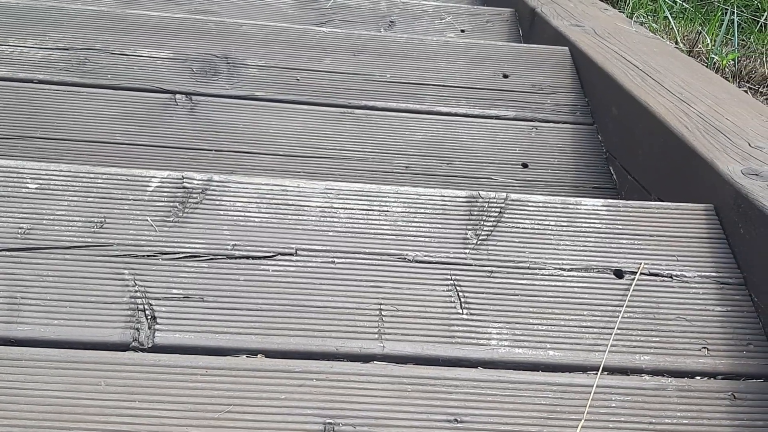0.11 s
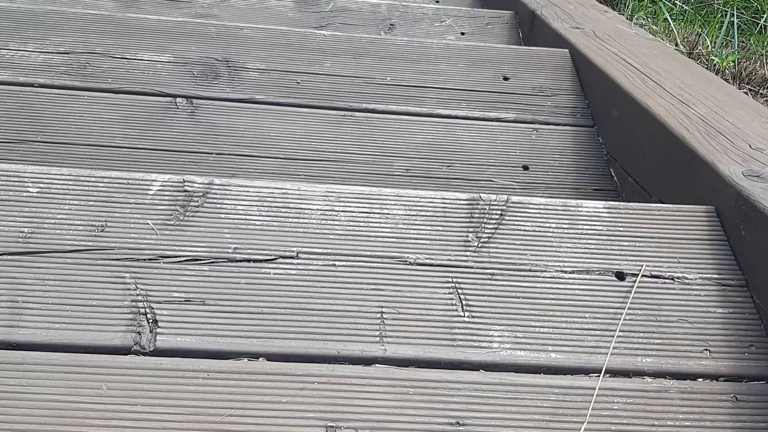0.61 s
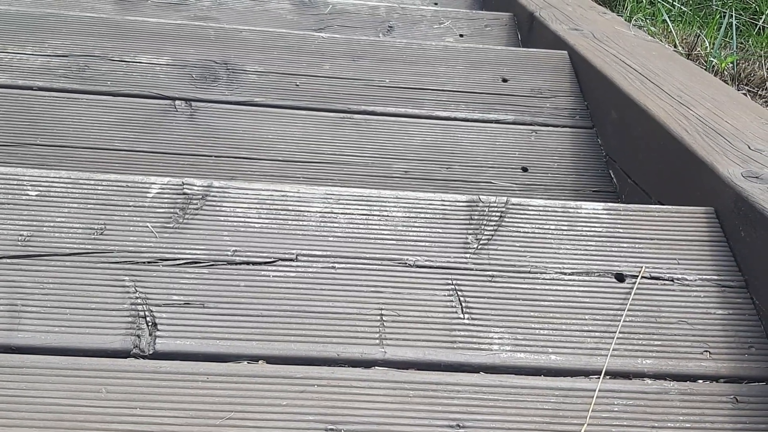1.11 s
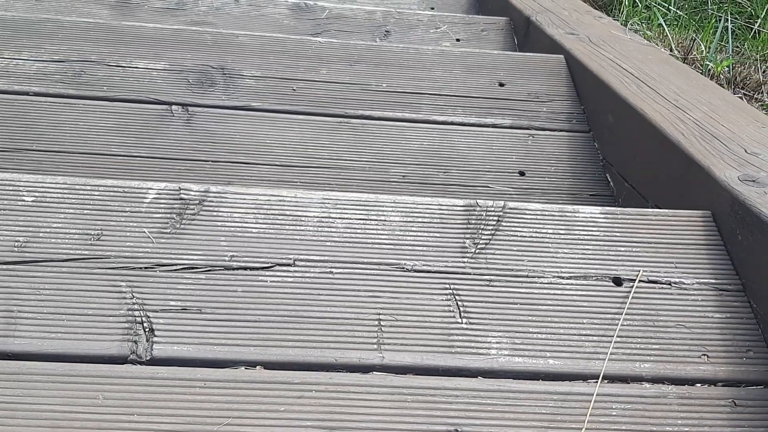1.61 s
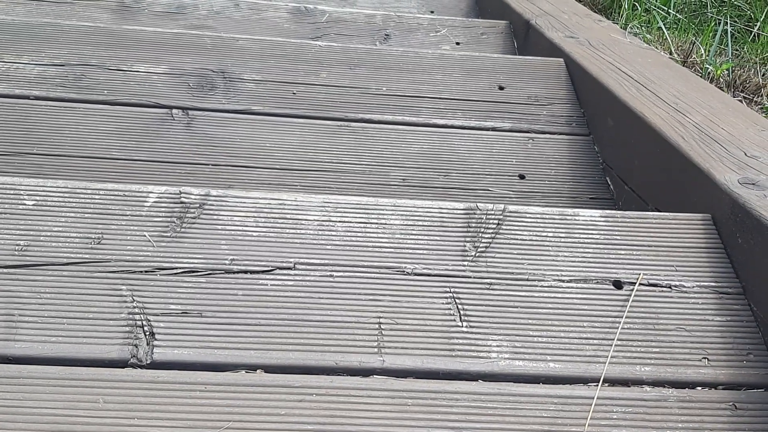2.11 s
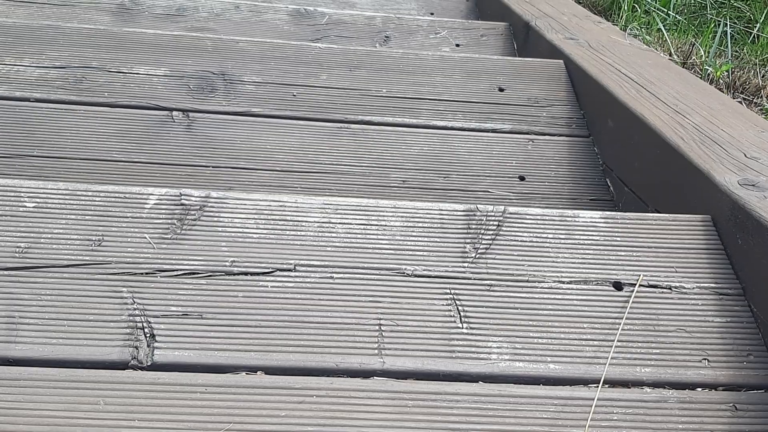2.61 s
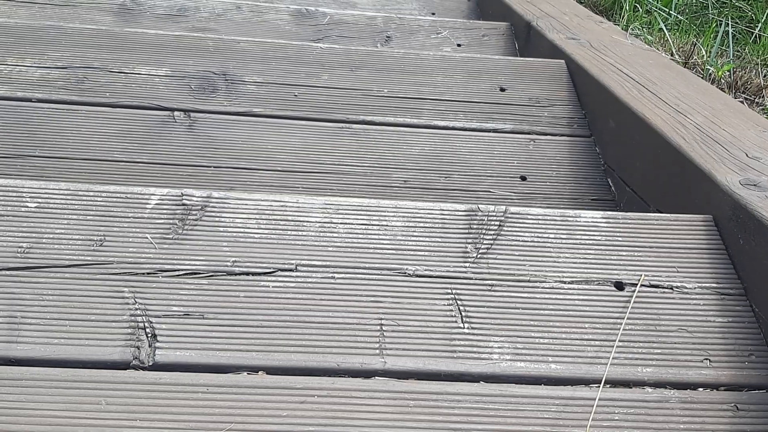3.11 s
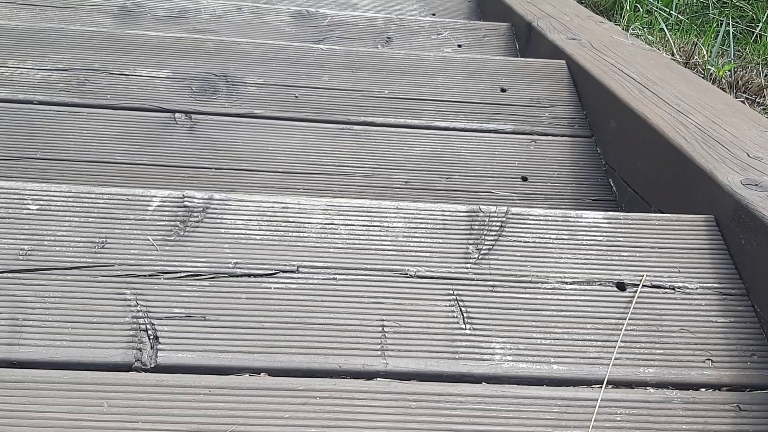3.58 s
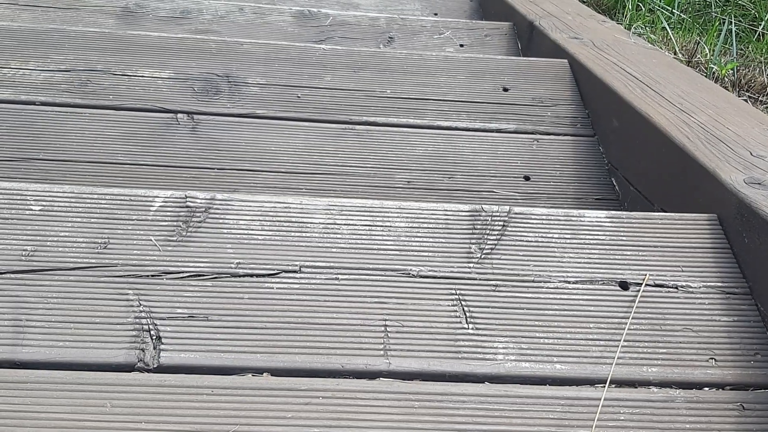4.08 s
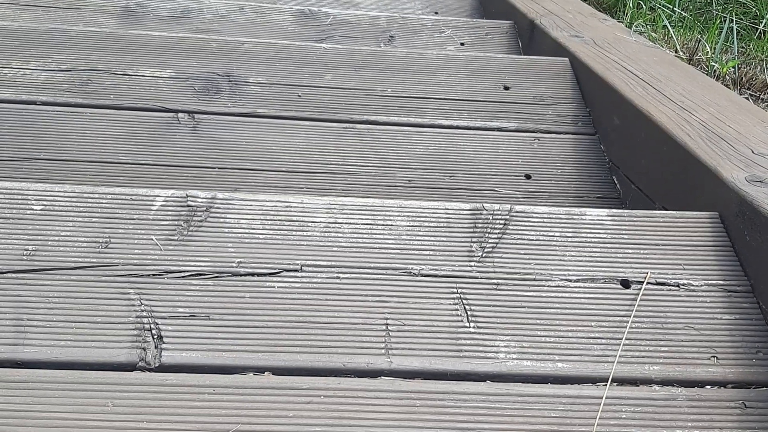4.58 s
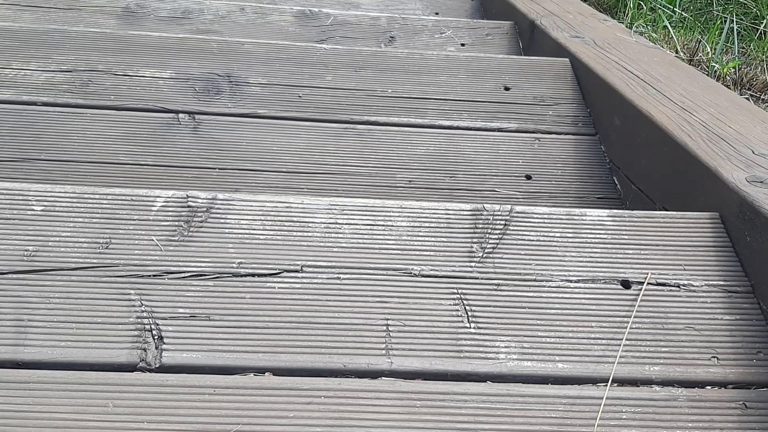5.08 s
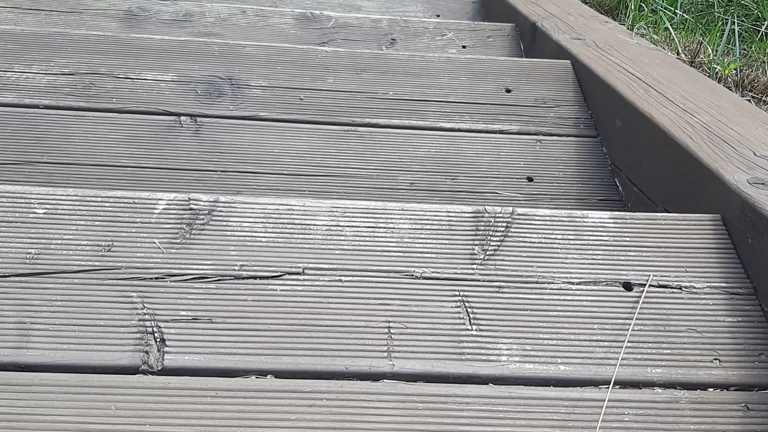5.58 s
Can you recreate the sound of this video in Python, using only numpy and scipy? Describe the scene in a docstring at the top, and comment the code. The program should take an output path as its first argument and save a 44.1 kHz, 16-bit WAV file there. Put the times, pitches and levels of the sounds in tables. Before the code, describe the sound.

A thick field of cicadas sizzles continuously, wide in stereo and leaning left. One closer insect adds a crisp fast rattle that gradually loosens into slower pulses and ceases about midway; the remaining drone crests then and ebbs very slightly. Underneath are quiet distant traffic noise, a low unsteady hum, a brief faint moan and soft knocks early and after the close singer stops. Open outdoor place, static stereo pickup.

```python
"""From the start a cicada chorus drones, stronger on the left, over far town noise and a wavering hum.
A nearer singer throbs clearly: rib snaps gate noise shaped by body resonances. A low moan and a bump pass early.
The near singer slows from 0.9 s and falls silent at about 3 s, as the chorus crests; it then ebbs.
Two close bumps follow near 3.8 s. Chorus: five rib-gated singers; town: filtered noise; hum, moan, bumps: sines.
"""
import sys
import numpy as np
from scipy import signal
from scipy.fft import rfft, irfft, next_fast_len
from scipy.io import wavfile
from scipy.ndimage import uniform_filter1d

SR = 44100
rng = np.random.default_rng(int(sys.argv[2]) if len(sys.argv) > 2 else 0)


def materialize(psi):
    """Save the field psi as 16-bit PCM at rate SR to the path in sys.argv[1].

    A 1-D psi becomes a single channel; in a 2-D psi each row is a channel.
    """
    bounded = np.clip(np.atleast_2d(psi).T, -1, 1)
    quanta = np.round(bounded * 32767).astype(np.int16)
    wavfile.write(sys.argv[1], SR, quanta)


def level_to_linear(level):
    """Convert decibel levels to linear amplitude factors, elementwise."""
    exponent = np.asarray(level, float) / 20
    return 10 ** exponent


N = 251370
FFT_SIZE = next_fast_len(N)
HZ = np.fft.rfftfreq(FFT_SIZE, 1 / SR)
T = np.arange(N) / SR  # s

# far singers: muscle_cycles_per_s, level_db
FAR_SINGERS = [(41.5, -3), (45.6, -1), (48, -1.5), (50.6, -0.5), (55, -3.5)]
# rib snaps in one muscle cycle, four strong, two weak: level_db
RIB_SNAPS = [-1, -2.5, -0.5, -1, -9, -13]
# chorus spectrum: freq_hz, density_db_per_hz
CHORUS_SPECTRUM = [(1590, -45), (2700, -26), (3060, -23), (3360, -8.5), (3620, -7), (3780, -5), (4100, -6),
                   (4850, -0.5), (5250, -2.5), (5990, -1.5), (6350, -1), (7740, -16.5), (9850, -18.5),
                   (11800, -23.5), (15500, -42.5)]
# resonances and dips on the chorus: centre_hz, width_hz, left_db, right_db
CHORUS_RESONANCES = [(3710, 350, 2.5, -0.5), (3970, 88, -2.5, -2), (4770, 300, 0, 2), (4970, 100, 1.5, 2),
                     (5700, 240, 2, 1.5), (7370, 320, 2.5, -3)]
# chorus balance: freq_hz, left_over_right_db
CHORUS_BALANCE = [(60, 1.0), (99, 1.0), (160, 1.0), (270, 1.5), (450, 1.5), (740, 1.0), (1220, 1),
                  (2010, 1), (3330, 4), (5500, 4.5), (9080, 6), (15000, -4.5)]
# phase of the cicadas' shared wave: freq_hz, left_lead_rad
CICADA_PHASE = [(0, 0), (860, 1), (1460, -1.5), (3190, -1), (3700, -2), (4570, -1.2), (5510, -0.5),
                (6120, 1), (6630, -2), (7410, -2.5), (10800, 5.5), (14100, 10), (14500, 15), (15200, 16)]
# near singer's body resonances at each port: centre_hz, width_hz, left_db, right_db
BODY_RESONANCES = [(3130, 190, -18, -24), (3656, 300, -8, -10.5), (4160, 300, -8, -16),
                   (4560, 310, -5.5, -4.5), (5020, 210, -1.5, -12), (5450, 460, -3.5, -7.5),
                   (5830, 270, -3, -9), (6440, 210, -3, -12), (6700, 310, -4.5, -12),
                   (8700, 3300, -26.5, -31), (10900, 2800, -35, -33)]
# clear body modes, peak before snap gating and fade: centre_hz, left_db, right_db
CLEAR_MODES = [(6410, -29, -39), (5410, -37, -40), (4520, -39, -38)]
# town spectrum: freq_hz, density_db_per_hz
TOWN_SPECTRUM = [(15, -49), (25, -22.5), (104, -1.5), (294, -13.5), (475, -7), (655, -13.5), (816, -7.5),
                 (1060, -11), (1240, -7.5), (1430, -14), (1680, -10), (1840, -16.5), (2010, -11.5),
                 (2200, -17.5), (2400, -15), (2600, -18), (2800, -17), (3000, -15), (3900, -41),
                 (6600, -120)]
# town left-right likeness: freq_hz, likeness_0_to_1
TOWN_LIKENESS = [(60, 0.98), (120, 0.96), (240, 0.87), (480, 0.81), (950, 0.51), (1890, 0.02), (3770, 0.13),
                 (7520, 0.1), (15000, 0.07)]
# town balance: freq_hz, left_over_right_db
TOWN_BALANCE = [(60, 0.5), (120, 0.5), (240, 2), (480, 0.5), (950, 1), (1890, 5.5), (3770, -0.5),
                (7520, 5.5), (15000, 1.0)]
# hum swells: start_s, length_s, level_db
HUM_SWELLS = [(-.2, 0.38, -52), (.98, .28, -52), (1.33, .7, -54), (2.4, .64, -52), (3.62, .5, -55),
              (4.15, 0.75, -52.5), (5.07, 0.18, -54)]
# low moan: start_s, length_s, pitch_hz, level_db
LOW_MOAN = (0.22, 0.63, 177.5, -44.5)
# dull bumps: start_s, level_db
DULL_BUMPS = [(.622, -38), (3.77, -37.5), (3.803, -40.5)]

CREST_S, CREST_DB, RISE_DB_PER_S, EBB_DB_PER_S = 3.0, -23, 0.62, 0.36
NEAR_CYCLES_PER_S, NEAR_DB = 45.6, -24.5  # at full effort
TIRES_S, SAG_CYCLES_PER_S2 = 0.9, 5.2
FADE_DB_PER_SAG2 = 0.02  # dB per squared lost cycle/s
STOPS_S, RELEASE_DB_PER_S = 2.93, 100
TOWN_DB = -42
HUM_HZ, HUM_DB, HUM_WAVER_DB = 107.7, -62, 3.5
MOAN_DIP, MOAN_SETTLE_S = 0.3, 0.0397  # dip as fraction of pitch
BUMP_HZ, BUMP_RISE_S = 387, 0.0058


def read(points, column=1):
    """Interpolates a table column on a log-frequency axis."""
    table = np.transpose(points)
    return np.interp(np.log(HZ + 1), np.log(table[0] + 1), table[column])


def evened(x):
    """Scales to rms 1."""
    return x / np.sqrt(np.mean(x ** 2) + 1e-20)


def drift(top_hz):
    """Slow random wander of rms 1: sines of random phase, held for 64 samples."""
    coarse_s = T[::64]
    wander = sum(np.sin(2 * np.pi * (hz * coarse_s + rng.random())) / np.sqrt(hz)
                 for hz in np.geomspace(0.2, top_hz, 16))
    return evened(wander.repeat(64)[:N])


def arch(start_s, length_s):
    """Half-sine rise and fall."""
    return np.sin(np.pi * np.clip((T - start_s) / length_s, 0, 1))


def phase(hz):
    """Phase in radians of a moving pitch."""
    return 2 * np.pi * np.cumsum(hz) / SR


def ports(gate, same, left_lead_rad=0):
    """Spectra of gated noise at both ports: partly the same wave, partly scattered on another path."""
    left, other = rfft(gate * rng.standard_normal((2, N)), FFT_SIZE)
    same = np.clip(same, 0, 1)
    shared = same * left * np.exp(-1j * left_lead_rad)
    right = shared + np.sqrt(1 - same ** 2) * other
    return np.array([left, right])


def heard(spectra):
    """Spectra back to sound, rms 1 over both ports."""
    return evened(irfft(spectra, FFT_SIZE)[:, :N])


def tymbal(cycles_per_s, snap, blur):
    """Power of ribs buckling in turn, each snap decaying; echoes fill the gaps by a steady blur."""
    ribs = len(RIB_SNAPS) * (np.cumsum(cycles_per_s) / SR + rng.random())
    rib_index = ribs.astype(int) % len(RIB_SNAPS)
    power = level_to_linear(RIB_SNAPS)[rib_index] ** 2 * np.exp(-snap * (ribs % 1))
    power = uniform_filter1d(power, size=40)
    return power / power.mean() + blur


def chorus():
    """Singers out of step, each drifting in speed and loudness, blurred by distance; one slow swell."""
    power = 0
    for cycles_per_s, level_db in FAR_SINGERS:
        rate = cycles_per_s * (1 + 0.006 * drift(1))
        loudness = level_to_linear(level_db + 1.6 * drift(3)) ** 2
        power = power + loudness * tymbal(rate, snap=1.5, blur=1.6)
    power /= uniform_filter1d(power, SR // 2)  # many voices keep the sum steady
    rings_db = sum(np.array([[left_db], [right_db]]) / (1 + (2 * (HZ - hz) / width_hz) ** 2)
                   for hz, width_hz, left_db, right_db in CHORUS_RESONANCES)
    lean_db = read(CHORUS_BALANCE) * [[0.5], [-0.5]]
    spectra = ports(np.sqrt(power), same=0.3, left_lead_rad=read(CICADA_PHASE))
    drone = heard(spectra * level_to_linear(read(CHORUS_SPECTRUM) + lean_db + rings_db))
    below_crest_db = np.maximum(RISE_DB_PER_S * (CREST_S - T), EBB_DB_PER_S * (T - CREST_S))
    return drone * level_to_linear(CREST_DB - below_crest_db)


def near_cicada():
    """Snaps ring the hollow body; the muscle slows steadily and weakens, then the song stops."""
    sag = SAG_CYCLES_PER_S2 * np.maximum(T - TIRES_S, 0)  # lost cycles/s
    release_db = RELEASE_DB_PER_S * np.maximum(T - STOPS_S, 0)
    fade_db = FADE_DB_PER_SAG2 * sag ** 2 + release_db
    gate = np.sqrt(tymbal(NEAR_CYCLES_PER_S - sag, snap=2.2, blur=0.29))
    body_power = sum(level_to_linear([[left_db], [right_db]]) ** 2 / (1 + (2 * (HZ - hz) / width_hz) ** 2) ** 2
                     for hz, width_hz, left_db, right_db in BODY_RESONANCES)
    spectra = ports(gate, same=0.31, left_lead_rad=read(CICADA_PHASE))
    song = heard(spectra * np.sqrt(body_power)) * level_to_linear(NEAR_DB)
    return (song + clear_rings(gate)) * level_to_linear(-fade_db)


def clear_rings(gate):
    """The sharpest body modes ring evenly under the snaps, their pitch trembling a little."""
    tremble = uniform_filter1d(rng.standard_normal((len(CLEAR_MODES), N)), size=300, axis=1)
    rings = 0
    for (hz, left_db, right_db), wobble in zip(CLEAR_MODES, tremble):
        pitch_hz = hz + 39.9 * evened(wobble)
        rings = rings + level_to_linear([[left_db], [right_db]]) * np.sin(phase(pitch_hz))
    return uniform_filter1d(gate, size=60) * rings


def town():
    """Far traffic and air: smooth noise, alike at both ports in the bass."""
    lean_db = read(TOWN_BALANCE) * [[0.5], [-0.5]]
    spectra = ports(level_to_linear(0.46 * drift(8)), read(TOWN_LIKENESS))
    return level_to_linear(TOWN_DB) * heard(spectra * level_to_linear(read(TOWN_SPECTRUM) + lean_db))


def hum():
    """A low machine tone: a sine wavering in pitch and level, with added swells."""
    pitch_hz = HUM_HZ * (1 + 0.0121 * drift(5))
    level = level_to_linear(HUM_DB + HUM_WAVER_DB * drift(6))
    level = level + sum(level_to_linear(db) * arch(start_s, length_s) for start_s, length_s, db in HUM_SWELLS)
    return np.sqrt(2) * level * np.sin(phase(pitch_hz))  # level is rms


def moan():
    """One low tone from afar: a wavering sine that slides up from below."""
    start_s, length_s, hz, db = LOW_MOAN
    slide = 1 - MOAN_DIP * np.exp(-np.maximum(T - start_s, 0) / MOAN_SETTLE_S)
    pitch_hz = hz * slide * (1 + 0.01 * drift(6))
    return level_to_linear(db + 2.5 * drift(11.5)) * arch(start_s, length_s) * np.sin(phase(pitch_hz))


def bumps():
    """Soft dull bumps: sine bursts that rise briefly and die away."""
    out = np.zeros(N)
    for start_s, db in DULL_BUMPS:
        u = np.maximum(T - start_s, 0) / BUMP_RISE_S
        out += level_to_linear(db) * u * np.exp(1 - u) * np.sin(2 * np.pi * BUMP_HZ * (T - start_s))
    return out


def scene():
    """Cicadas over the distant town; the low tones and bumps lean slightly left."""
    low_sounds = (hum() + moan() + bumps()) * level_to_linear([[0.6], [-0.6]])
    return chorus() + near_cicada() + town() + low_sounds


def low_pass(x):
    """Removes everything above the highest recorded frequency."""
    return signal.sosfilt(signal.butter(12, 15660, fs=SR, output="sos"), x)


def record(dry):
    """Turns the finished mix into the output."""
    return low_pass(dry)


dry = scene()
out = record(dry)
materialize(out)
```